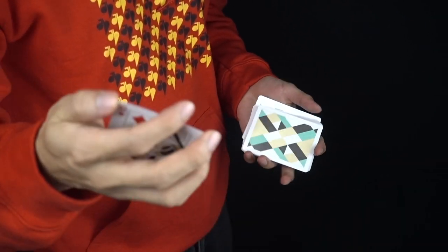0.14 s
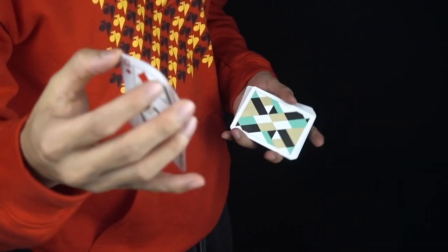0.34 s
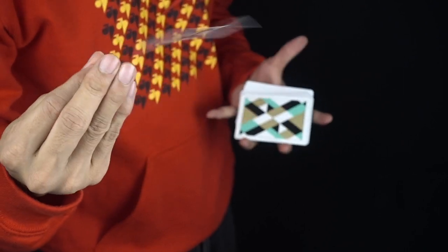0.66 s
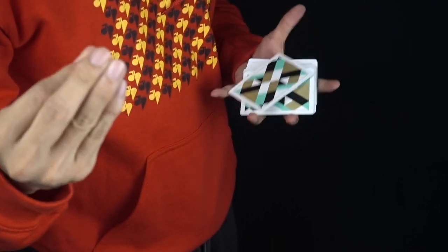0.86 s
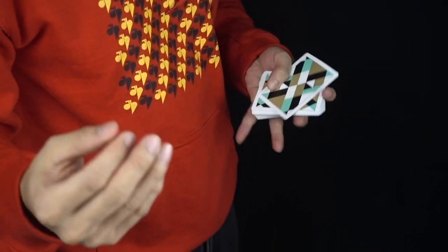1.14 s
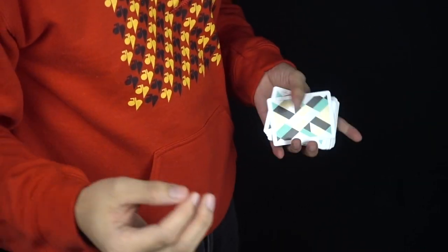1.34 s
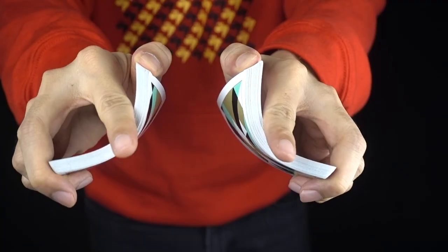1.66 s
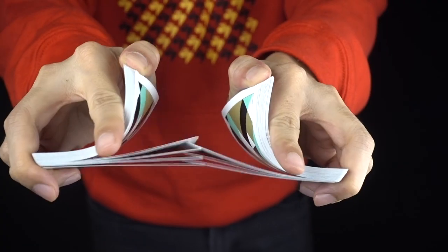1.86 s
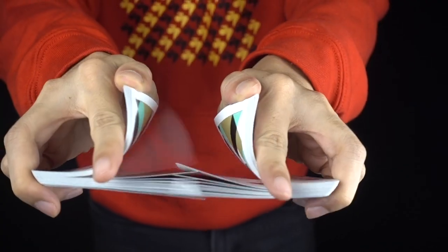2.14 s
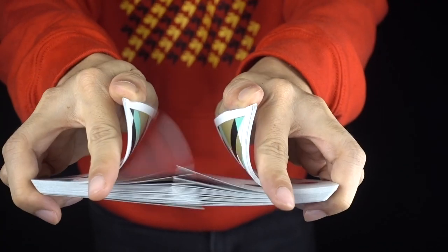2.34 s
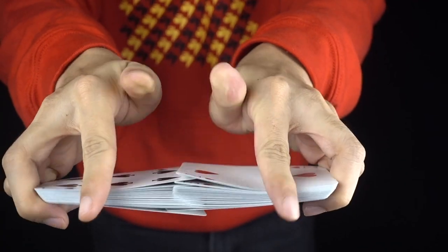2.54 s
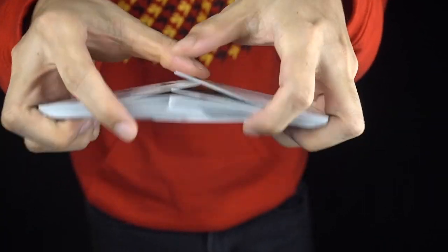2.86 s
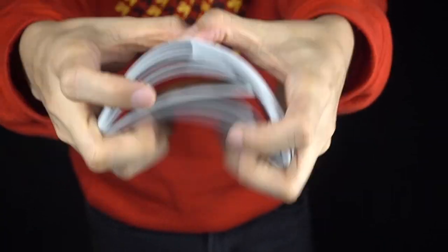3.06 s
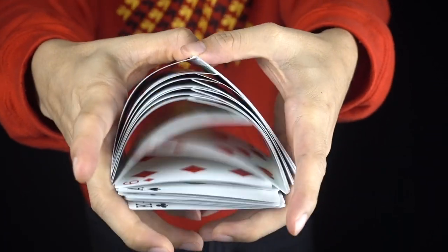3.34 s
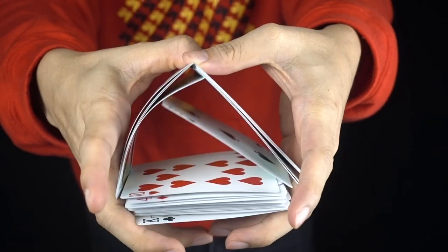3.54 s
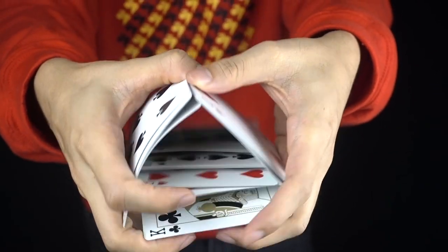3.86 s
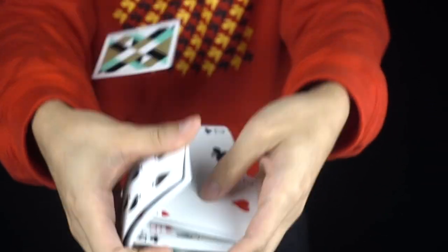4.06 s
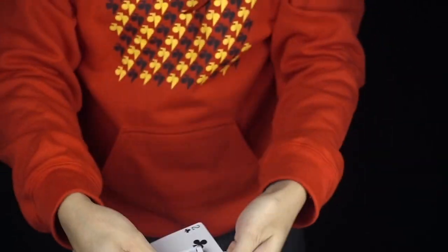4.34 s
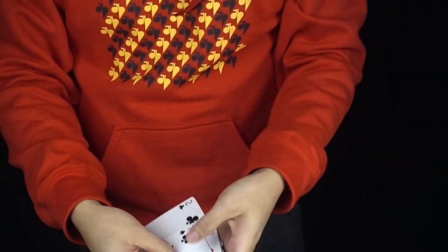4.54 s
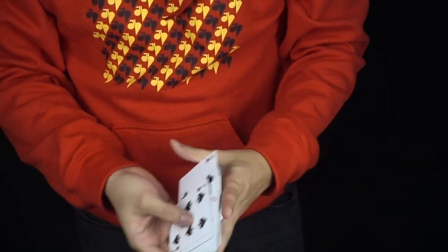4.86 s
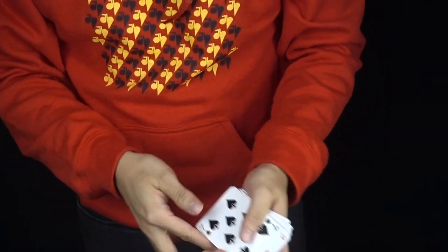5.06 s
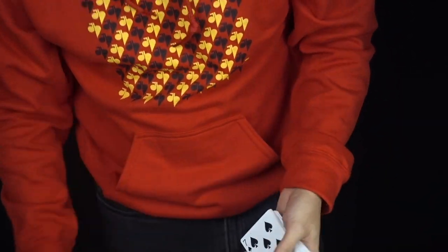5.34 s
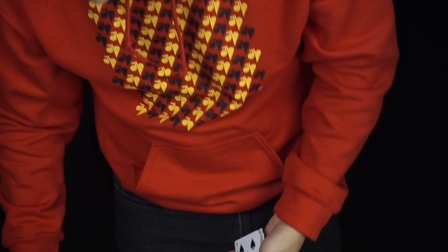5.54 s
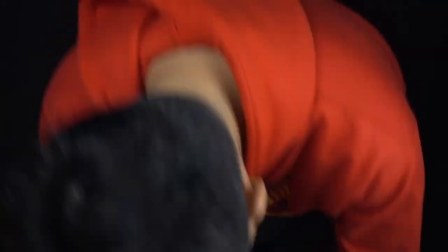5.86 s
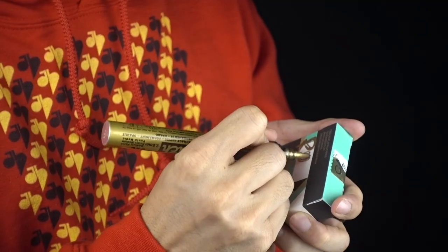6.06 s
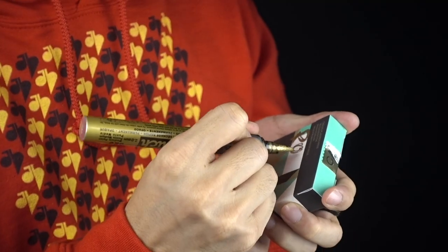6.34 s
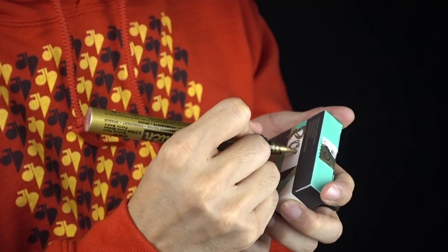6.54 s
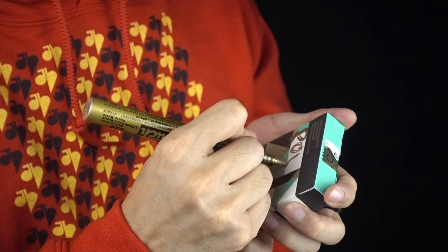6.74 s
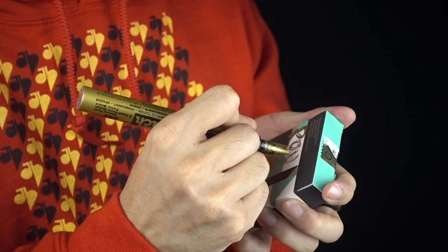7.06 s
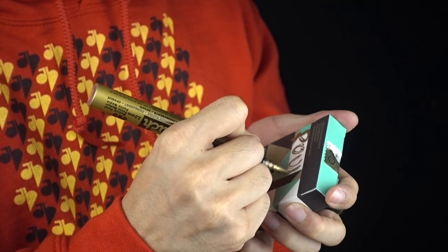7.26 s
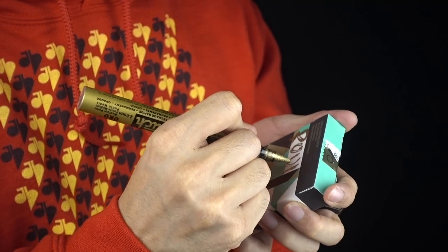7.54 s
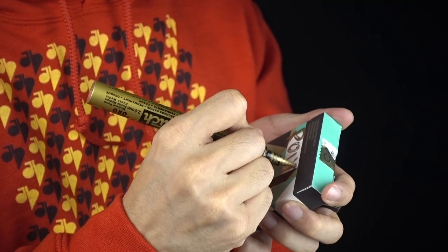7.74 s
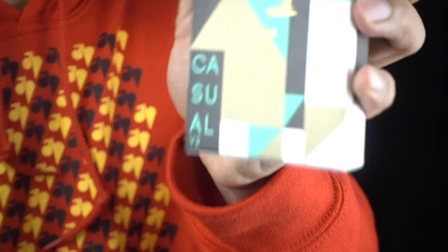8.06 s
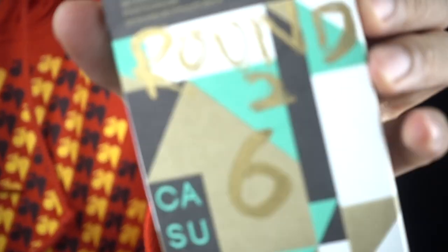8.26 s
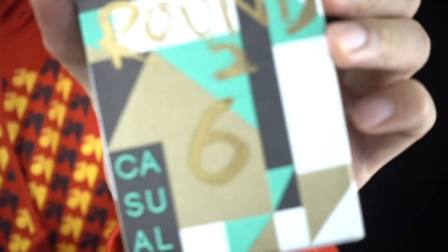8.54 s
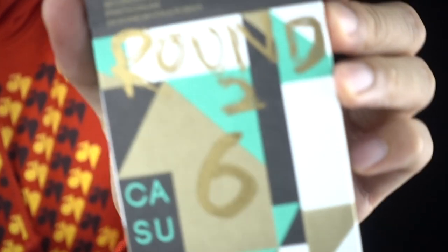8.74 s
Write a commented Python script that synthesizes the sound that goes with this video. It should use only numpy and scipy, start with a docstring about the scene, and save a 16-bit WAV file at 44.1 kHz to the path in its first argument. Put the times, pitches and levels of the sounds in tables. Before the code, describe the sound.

In a small, quiet room with a faint ventilation hum, playing cards are handled close to a stereo microphone. One card snaps loudly, then comes a quick riffle shuffle ending in sharp snaps, followed by the fluttering hiss of the bridge. After some soft rubbing, dropped cards slap the floor twice a little farther away. Short, quiet marker strokes on the hollow cardboard box and a few dry clicks of its flap come last.

```python
"""Playing cards shuffled close to a stereo microphone in a small, quiet room with faint ventilation.
A bent card pops straight and is caught; the deck riffles off the thumbs, edges scraping and faces
rattling, then springs flat in a hissing bridge. Farther off, dropped cards clap on the floor.
Back at the microphone, a paint marker's felt nib drags over the card box, which clicks in the fingers."""
import sys
import numpy as np
from scipy import signal
from scipy.fft import rfft, irfft, next_fast_len
from scipy.io import wavfile
from scipy.ndimage import uniform_filter1d, minimum_filter1d

SR = 44100
rng = np.random.default_rng(int(sys.argv[2]) if len(sys.argv) > 2 else 0)


def master_out(mix):
    """Clip the mix to full scale and print it as 16-bit PCM to the path in sys.argv[1]."""
    frames = np.transpose(np.atleast_2d(mix))
    ceiling = np.clip(frames, -1, 1)
    pcm = np.round(ceiling * 32767).astype(np.int16)
    wavfile.write(sys.argv[1], SR, pcm)


N = 392479

# Spectra of a card's scraping edge, rattling face, thud on the pile, slap and thump [f/Hz, level/dB]
EDGE_SPECTRUM = [(1500, -20), (3500, -6), (6000, 0.5), (10000, 0.5), (16000, -4.5)]
FACE_SPECTRUM = [(300, -13), (900, -8.5), (1300, -5), (1700, 0.5), (2100, -1), (2550, 0.5), (3200, -1.5),
                 (4200, -13.5), (8000, -56.5)]
THUD_SPECTRUM = [(20, -26.5), (60, -5.5), (190, -1.5), (300, 1), (560, -1), (1000, -4.5), (2500, -36.5)]
SLAP_SPECTRUM = [(1500, -15.5), (4000, -2), (6000, -5.5), (10000, -8), (16000, -16)]
THUMP_SPECTRUM = [(20, -47.5), (50, -27), (100, -14), (190, -1.5), (330, -4), (570, 0.5), (850, -4),
                  (1500, -2), (3000, -25.5)]
# The thumbs let the packets run, pause and run again [t/s, length/s, first effort/dB, last effort/dB]
RIFFLE_RUNS = [(1.798, 0.14, -2.5, 1), (2.012, 0.55, -3.5, 2.5)]


def amp(db):
    """Decibels to gain."""
    return 10 ** (np.asarray(db) / 20)


def unit(x):
    """Scale to rms 1."""
    return x / np.sqrt(np.mean(x ** 2) + 1e-20)


def along(points, hz):
    """Read (f/Hz, value) points on a log frequency axis."""
    freqs, values = np.transpose(points)
    return np.interp(np.log(hz + 1), np.log(freqs), values)


def add(track, s, sound):
    """Mix a sound in at s seconds."""
    part = track[..., round(s * SR):][..., :sound.shape[-1]]
    part += sound[..., :part.shape[-1]]


def filtered(x, response):
    """Filter x by a function of frequency in Hz."""
    size = next_fast_len(N + 8192)
    return irfft(rfft(x, size) * response(np.fft.rfftfreq(size, 1 / SR)), size)[..., :N]


def resonance(hz, centre_hz, width_hz):
    """Frequency response of one damped mode."""
    return 1j * hz * width_hz / (centre_hz ** 2 - hz * hz + 1j * hz * width_hz)


def colour(x, spectrum, size=4096):
    """Minimum-phase filter with the given spectrum; white noise keeps its level."""
    cepstrum = irfft(np.log(amp(along(spectrum, np.fft.rfftfreq(size, 1 / SR)))))
    cepstrum[1:size // 2] *= 2
    cepstrum[size // 2 + 1:] = 0
    kernel = irfft(np.exp(rfft(cepstrum)))
    return signal.oaconvolve(x, kernel[None] / np.linalg.norm(kernel), axes=1)[:, :N]


def fade(t, t60):
    """Decay by 60 dB every t60 seconds."""
    return np.exp(-np.log(1000) * t / t60)


def swell(s, length, attack, release):
    """Rise, hold and fall in dB per sample; attack and release are seconds per 60 dB."""
    t = np.arange(N) / SR - s
    return -60 * np.clip(np.maximum(-t / attack, (t - length) / release), 0, 2)


def strokes(rows, attack, release):
    """One gain curve for each level column of rows (t/s, length/s, level/dB, ...)."""
    levels = [swell(s, length, attack, release) + np.array(dbs)[:, None] for s, length, *dbs in rows]
    return amp(np.max(levels, axis=0))


def uneven(start, length, per_s):
    """Cards following each other unevenly: rows (t/s, share of the run gone, luck of variance 1)."""
    draws = rng.random((64, 2))
    gone = (np.arange(len(draws)) + draws[:, 0]) / (per_s * length)
    luck = (draws[:, 1] - 0.5) * np.sqrt(12)
    return np.column_stack([start + gone * length, gone, luck])[gone < 1]


def burst(t60, rise, grit_db=3):
    """The force of one contact: a short, gritty puff of mid/side noise."""
    t = np.arange(SR // 8) / SR
    shape = fade(t, t60) * (1 - np.exp(-t / rise))
    grit = amp(grit_db * np.repeat(rng.standard_normal(len(t)), 8)[:len(t)])
    puff = rng.standard_normal((2, len(t))) * shape * grit
    return puff * np.linalg.norm(shape) / np.linalg.norm(puff, axis=1, keepdims=True)


def friction(per_s, rough_db):
    """Mid/side noise that catches and slips about per_s times a second."""
    grip = np.interp(np.arange(N) * per_s / SR, np.arange(N), rng.standard_normal(N))
    return unit(rng.standard_normal((2, N)) * amp(rough_db * grip))


def stereo(mid_side, width):
    """Mid/side to left/right; the two capsules hear the bass alike."""
    mid = mid_side[0]
    side = filtered(mid_side[1], lambda hz: amp(along(width, hz)))
    return np.array([mid + side, mid - side])


def room_tone():
    """Steady ventilation all around the microphone, droning a little in the room's resonances."""
    # Ventilation spectrum [f/Hz, level/dB]
    air_spectrum = [(12, -53), (20, -11), (68, -9.5), (91, -3.5), (216, -8), (277, -0.5), (301, -6),
                    (446, -4), (513, -8), (698, -8), (1260, -12.5), (2080, -11.5), (4540, -22.5),
                    (12800, -23.5), (16000, -28)]
    # Room resonances [f/Hz, width/Hz, level/dB]
    modes = [(100, 11.7, -9.5), (186, 22, 2), (271, 20, 2.5), (452, 55, 1), (673, 55, 3)]
    # Stereo width of the air [f/Hz, side gain/dB]
    width = [(60, -23.5), (110, -14.5), (200, -11), (380, -9.5), (700, -7), (1290, -2), (2380, -3.5),
             (4400, 2), (8120, 0), (15000, -2)]
    ringing = lambda hz: sum(amp(db) * resonance(hz, centre, band) for centre, band, db in modes)
    drone = unit(filtered(rng.standard_normal((2, N)), ringing))
    air = colour(rng.standard_normal((2, N)), air_spectrum)
    return amp(-57.5) * stereo(amp(-1.34) * air + amp(-9) * drone, width)


def room_tail(gap_s=0.0028, early_db=3, early_t60=0.14):
    """Near walls answer first and strongest; then each frequency dies at its own speed."""
    # Late decay of the room [f/Hz, t60/s]
    decay_times = [(150, 0.44), (500, 0.57), (1400, 0.42), (2500, 0.39), (5000, 0.54), (10000, 0.35),
                   (16000, 0.48)]
    hz, t, noise = signal.stft(rng.standard_normal((2, SR * 3 // 4)), SR, nperseg=256)
    decay = fade(t, along(decay_times, hz)[:, None]) + amp(early_db) * fade(t, early_t60)
    tail = signal.istft(noise * decay, SR, nperseg=256)[1]
    tail *= np.clip(np.arange(tail.shape[1]) / SR / gap_s - 1, 0, 1)
    return tail / np.linalg.norm(tail[0])


def room(x):
    """The walls' diffuse answer, wider than the close sound."""
    # Stereo width of the reverberation [f/Hz, side gain/dB]
    width = [(100, -39), (500, -21.5), (1300, -8.5), (2400, -11.5), (4000, 2), (7000, -0.5), (15000, 1)]
    return stereo(signal.oaconvolve(x[:1], room_tail(), axes=1)[:, :N], width)


def finger_squeak(length_s=0.019):
    """Skin sticks and slips on a card's varnish: a tiny falling note."""
    # Fingertip slips [t/s, first f/Hz, last f/Hz, level/dB]
    slips = [(0.543, 673, 580, -46)]
    track = np.zeros((2, N))
    progress = np.clip(np.arange(SR // 8) / SR / length_s, 0, 1)
    for s, first_hz, last_hz, db in slips:
        hz = first_hz + (last_hz - first_hz) * progress
        note = np.sin(2 * np.pi * np.cumsum(hz) / SR)
        add(track[0], s, amp(db) * np.sin(np.pi * progress) * note)
    return track


def marker():
    """Close up, a felt nib drags across the hollow cardboard box."""
    # Marker strokes [t/s, length/s, nib/dB, box/dB]
    writing = [(6.027, 0.036, -43, -47.5), (6.14, 0.035, -58.5, -60), (6.755, 0.1, -53.5, -56.5),
               (6.88, 0.08, -47.5, -54.5), (7.23, 0.092, -59.5, -63.5), (7.32, 0.041, -52.5, -54.5),
               (7.465, 0.004, -57, -62), (7.988, 0.016, -55, -54)]
    # Spectra of the nib and the hollow box [f/Hz, level/dB]
    nib_spectrum = [(2000, -27), (3100, -14), (3600, -4.5), (4300, -10.5), (5200, -4.5), (6100, -2.5),
                    (7000, -7), (8100, -15), (9400, -9), (10400, -13), (11300, -11), (12700, -23),
                    (16000, -25)]
    box_spectrum = [(500, -38), (880, -22), (1080, 3.5), (1450, 1), (1800, 0.5), (2350, 7), (2750, 2),
                    (3200, -13), (5000, -29.5)]
    nib, box = strokes(writing, attack=0.074, release=0.2)
    drag = friction(per_s=450, rough_db=2)
    return amp(-1) * colour(nib * drag, nib_spectrum) + colour(box * drag, box_spectrum)


def box_clicks(ring_db=9):
    """The box's flap ticks and a finger drags; both sound its stiff, well damped panel."""
    # Ticks of the flap [t/s, level/dB]
    flap_ticks = [(8.1365, -26.5), (8.1551, -29), (8.5411, -21.5), (8.5904, -34.5)]
    # A finger on the panel [t/s, length/s, level/dB]
    finger_rubs = [(8.47, 0.087, -63)]
    ticks = np.zeros((2, N))
    for s, db in flap_ticks:
        add(ticks, s, amp(db - 8) * burst(t60=0.013, rise=0.00037))
    panel = lambda hz: resonance(hz, centre_hz=2650, width_hz=170)
    pressure = strokes(finger_rubs, attack=0.25, release=0.3)[0]
    drag = pressure * unit(filtered(rng.standard_normal((2, N)), panel))
    return colour(ticks, EDGE_SPECTRUM) + amp(ring_db) * filtered(ticks, panel) + drag


def card_slides():
    """Loose cards rub softly over each other in the hand."""
    # Slides [t/s, length/s, edge/dB, face/dB]
    slides = [(0.935, 0.018, -80, -48), (1.795, 0.016, -45.5, -40), (3.76, 0.14, -57.5, -56),
              (3.94, 0.038, -45.5, -42.5), (4.02, 0.081, -53.5, -49), (4.096, 0.047, -46.5, -40),
              (4.25, 0.29, -58, -54.5), (4.99, 0.072, -52.5, -55)]
    edge, face = strokes(slides, attack=0.03, release=0.35)
    rub = friction(per_s=370, rough_db=3.5)
    return amp(-4) * (colour(edge * rub, EDGE_SPECTRUM) + colour(face * rub, FACE_SPECTRUM))


def card_drops(topple_loss_db_per_s=116, topple_t60=0.022):
    """Flat cards trap air against the floor: a hollow clap, a bright slap and their weight's thump."""
    # Cards meeting the floor [t/s, level/dB, t60/s, slap/dB re clap, thump/dB re clap]
    falls = [(4.446, -29, 0.055, -18, -30), (4.454, -18.5, 0.11, -7, -18.5), (4.463, -2.5, 0.023, -7, -29),
             (4.472, -9, 0.013, -9.5, -32), (4.742, -28, 0.02, 0.5, -21),
             (4.7438, -12.5, 0.017, -12.5, -34)]
    # Loose cards toppling after a fall [t/s, length/s, first level/dB, slap/dB re clap, thump/dB re clap]
    topples = [(4.485, 0.115, -16.5, -7, -22), (4.76, 0.032, -20, -19.5, -34)]
    # Spectrum of the trapped air's clap [f/Hz, level/dB]
    clap_spectrum = [(40, -65), (170, -25.5), (400, -25.5), (600, -17), (1000, -14), (1300, -4),
                     (1850, -5.5), (2350, -1), (3200, -4.5), (3900, -11.5), (5000, -18.5), (6500, -22.5),
                     (12000, -41.5)]
    hits = list(falls)
    for start, length, first_db, slap_db, thump_db in topples:
        for s, _, luck in uneven(start, length, per_s=120):
            db = first_db - topple_loss_db_per_s * (s - start) + 2 * luck
            hits.append((s, db, topple_t60, slap_db, thump_db))
    clap, slap, thump = np.zeros((3, 2, N))
    for s, db, t60, slap_db, thump_db in hits:
        force = amp(db) * burst(t60, rise=0.00065, grit_db=-1)
        add(clap, s, force)
        add(slap, s, amp(slap_db) * force)
        add(thump, s, amp(thump_db) * force)
    return colour(clap, clap_spectrum) + colour(slap, SLAP_SPECTRUM) + colour(thump, THUMP_SPECTRUM)


def card_snaps(rise=0.00021, bass_cut_hz=600):
    """A bent card pops straight or catches, with a crack, thump and brief ring; tighter bends ring higher."""
    # Cards popping straight, or catching in a short rising scrape; the first row is a card edge ticking just
    # before the pop [t/s, level/dB, pitch factor, ring t60/s, crack offset/dB]
    snaps = [(0.704, -28, 1.8, 0.005, 4), (0.708, -6, 1.02, 0.014, -28), (0.712, -5.5, 1, 0.0082, -34),
             (0.7183, -13.5, 0.85, 0.017, -29), (0.7222, -13.5, 1.25, 0.01, -25),
             (1.21, -50.5, 1.2, 0.033, -4), (1.342, -46, 1.23, 0.022, -6), (2.361, -23, 1.45, 0.027, -11),
             (2.5283, -10.5, 1.067, 0.015, -17.5), (2.5676, -2.5, 0.95, 0.0048, -23),
             (2.781, -32, 0.8, 0.0098, -26), (3.017, -41, 1.1, 0.019, -7), (3.075, -40, 1.06, 0.023, -2),
             (3.195, -20, 1.36, 0.0058, -13), (4.099, -29, 0.82, 0.042, -14),
             (4.134, -31.5, 1, 0.034, -12.5), (4.7442, -15, 1.02, 0.017, -22),
             (8.072, -29, 1.24, 0.0036, -14)]
    # Modes of a bent card [f/Hz, level/dB]
    modes = [(1080, -25.5), (1650, -9.5), (1900, -4.5), (2380, -3), (3050, -15.5), (3600, -24.5),
             (4400, -31.5)]
    pops, cracks, thumps = np.zeros((3, 2, N))
    t = np.arange(SR // 8) / SR
    for s, db, pitch, t60, crack_db in snaps:
        ring = sum(amp(level) * np.exp(2j * np.pi * hz * pitch * t) for hz, level in modes)
        pop = amp(db + 1.5) * ring * fade(t, t60) * (1 - np.exp(-t / rise))
        add(pops[0], s, pop.imag)
        add(pops[1], s, amp(-3) * pop.real)  # the capsules differ in phase
        add(cracks, s, amp(db + crack_db) * burst(t60=0.0097, rise=0.00026))
        add(thumps, s, amp(db - 18) * burst(t60, rise=0.0002))
    # a small card radiates little bass
    radiated = filtered(pops, lambda hz: (1j * hz / (bass_cut_hz + 1j * hz)) ** 2)
    return radiated + colour(cracks, SLAP_SPECTRUM) + colour(thumps, THUMP_SPECTRUM)


def bridge(attack=0.071, cushion_db_per_s=18):
    """The woven arch springs flat: cards skim over each other, some in clumps, and patter down."""
    # The arch unloading [t/s, length/s, hiss/dB, face/dB, patter/dB]
    unloading = [(3.148, 0.41, -33.5, -39, -55.5)]
    # Clumps of cards letting go [t/s, half length/s, boost/dB]
    surges = [(3.23, 0.033, 2.5), (3.337, 0.0039, 3), (3.385, 0.0074, 5), (3.49, 0.008, 1),
              (3.523, 0.005, 2.5), (3.565, 0.038, 4.5)]
    # Spectra of the skimming hiss and the arched faces [f/Hz, level/dB]
    hiss_spectrum = [(1500, -19), (3300, -10), (4600, -8), (6200, -1), (7900, 0.5), (9000, 0), (10500, 2),
                     (13000, -3), (16000, -6.5)]
    arch_spectrum = [(500, -22), (1100, -7), (1500, -2.5), (1800, -1.5), (2500, 5), (3200, 2.5), (4300, -6),
                     (8000, -37)]
    hiss, _, patter = strokes(unloading, attack, release=0.18)
    face = strokes(unloading, attack, release=0.51)[1]
    t = np.arange(N) / SR
    clumps = amp(sum(db / (1 + ((t - s) / length) ** 4) for s, length, db in surges))
    elapsed = np.maximum(t - unloading[0][0], 0)
    cushion = amp(-cushion_db_per_s * elapsed)  # the growing pile softens the patter
    skim = colour(hiss * clumps * friction(per_s=200, rough_db=2.5), hiss_spectrum)
    arch = colour(face * clumps * friction(per_s=200, rough_db=2), arch_spectrum)
    pile = colour(patter * cushion * clumps * friction(per_s=170, rough_db=-1), THUD_SPECTRUM)
    return skim + amp(-3.5) * arch + pile


def riffle_scrape(edge_db=-47, face_db=-40.5, patter_db=-50):
    """Between flicks the released cards scrape into the weave in uneven catches, louder with effort."""
    t = np.arange(N) / SR
    effort = np.zeros(N)
    for s, length, first_db, last_db in RIFFLE_RUNS:
        effort_db = np.interp(t, [s, s + length], [first_db, last_db])
        effort += amp(effort_db + swell(s, length, attack=0.021, release=0.25))
    rub = effort * friction(per_s=600, rough_db=4)
    patter = effort * friction(per_s=120, rough_db=6)
    scrape = amp(edge_db) * colour(rub, EDGE_SPECTRUM) + amp(face_db) * colour(rub, FACE_SPECTRUM)
    return scrape + amp(patter_db) * colour(patter, THUD_SPECTRUM)


def riffled_cards(edge_db=-28, face_db=-34.5, thud_db=-41, scatter_db=1.5):
    """Cards run off the thumbs, landing harder with effort: rows (t/s, edge/dB, face/dB, thud/dB)."""
    cards = []
    for start, length, first_db, last_db in RIFFLE_RUNS:
        for s, gone, luck in uneven(start, length, per_s=65):
            effort_db = first_db + (last_db - first_db) * gone
            flick_db = effort_db + scatter_db * luck
            weight_db = 1.5 * effort_db - scatter_db * luck / 2
            cards.append((s, edge_db + flick_db, face_db + flick_db, thud_db + weight_db))
    return cards


def card_flicks():
    """Right at the microphone an edge scrapes free, the card's face rattles, and it thuds on the pile."""
    # Single cards leaving a fingertip [t/s, level/dB, face offset/dB]
    flicks = [(0.9527, -27, -19), (1.7994, -15, -2), (1.8267, -25, -18), (1.866, -15, -15),
              (1.875, -16.5, -15), (1.9342, -20, -20), (2.0041, -24.5, -5), (2.0144, -13.5, -12.5),
              (2.052, -25, -8), (2.107, -18.5, -3), (2.1322, -23, -12), (2.166, -20.5, -13),
              (2.1959, -16.5, -6.5), (2.2058, -18, -2.5), (2.2269, -18.5, -4.5), (2.2644, -18, -4),
              (2.2902, -16.5, -7.5), (2.3333, -16.5, -2), (2.3517, -16, 1), (2.4139, -18, -9),
              (2.4476, -19, -8), (2.4643, -25, 2.5), (2.495, -13, -7), (2.5014, -11.5, -9),
              (2.5189, -20, 1), (2.5383, -12.5, -14), (2.7813, -30, -3), (3.937, -30, -3.5),
              (3.9692, -27.5, -20), (4.001, -28.5, -17), (4.1032, -18.5, -11), (4.1342, -24, -16),
              (4.1776, -29.5, -0.5)]
    # Cards landing flat in the palm [t/s, level/dB]
    landings = [(0.9387, -38), (2.3622, -34), (2.5433, -24), (3.1502, -35), (3.194, -24.5), (3.2347, -26),
                (3.2522, -27.5), (3.268, -37), (3.566, -36.5), (4.1527, -38), (4.4143, -41.5)]
    flicked = [(s, db, db + face_db, db - 21.5) for s, db, face_db in flicks]
    landed = [(s, db - 1, db + 3, db) for s, db in landings]
    edge, face, thud = np.zeros((3, 2, N))
    for s, edge_db, face_db, thud_db in flicked + landed + riffled_cards():
        add(edge, s, amp(edge_db - 2) * burst(t60=0.012, rise=0.00089, grit_db=1.5))
        add(face, s, amp(face_db - 3) * burst(t60=0.016, rise=0.0007))
        add(thud, s, amp(thud_db) * burst(t60=0.015, rise=0.0006))
    return colour(edge, EDGE_SPECTRUM) + colour(face, FACE_SPECTRUM) + colour(thud, THUD_SPECTRUM)


def scene():
    """The hands are close and fairly dry, the floor farther off; all ring in the same small room."""
    flicks, snaps, drops, clicks = card_flicks(), card_snaps(), card_drops(), box_clicks()
    rubs = card_slides() + riffle_scrape() + bridge() + marker() + finger_squeak()
    # Stereo width of the direct sound [f/Hz, side gain/dB]
    width = [(100, -43.5), (1000, -22.5), (2000, -17.5), (3000, -5), (4200, 2), (8000, -4.5),
             (11000, -16.5), (15000, -3)]
    direct = stereo(flicks + snaps + drops + clicks + rubs, width)
    hands = amp(-5) * flicks + amp(-3.5) * clicks + amp(-10.5) * rubs
    reverb = room(hands) + room(amp(-6.5) * snaps) + room(amp(1) * drops)
    return direct + reverb + room_tone()


def record(dry, ceiling=0.76, hold_s=0.003, top_hz=16100):
    """The right capsule is slightly hotter; a fast limiter holds the peaks; nothing passes top_hz."""
    capsules = dry * amp([[-0.3], [0.3]])
    needed_gain = np.minimum(1, ceiling / (np.abs(capsules).max(axis=0) + 1e-9))
    span = max(round(hold_s * SR), 1)
    gain = uniform_filter1d(minimum_filter1d(needed_gain, span), span)
    return filtered(capsules * gain, lambda hz: hz < top_hz)


dry = scene()
out = record(dry)
master_out(out)
```